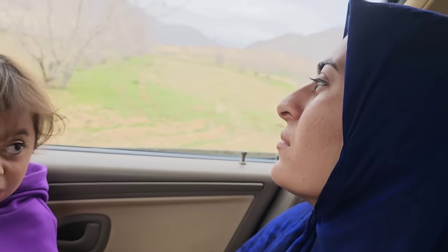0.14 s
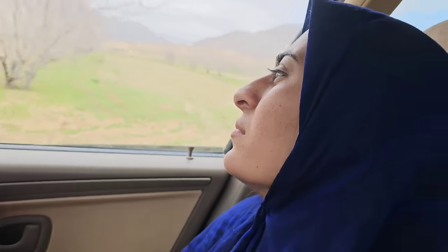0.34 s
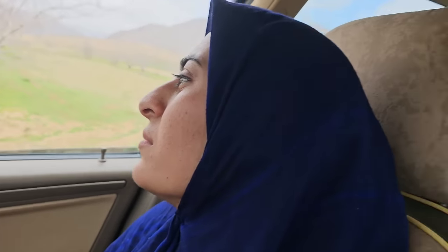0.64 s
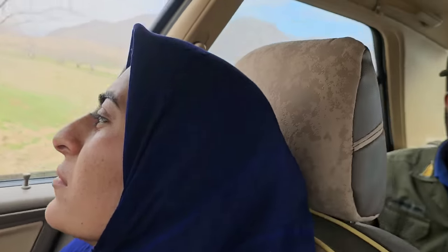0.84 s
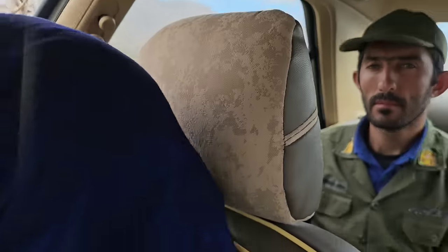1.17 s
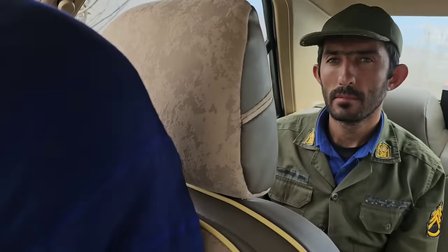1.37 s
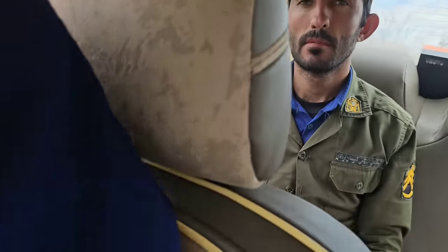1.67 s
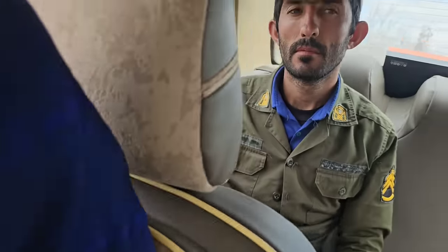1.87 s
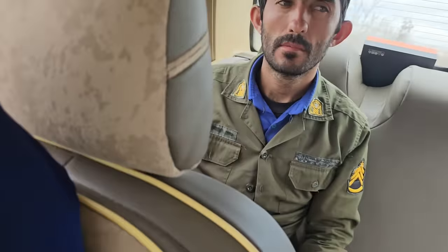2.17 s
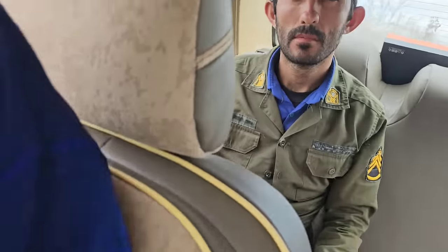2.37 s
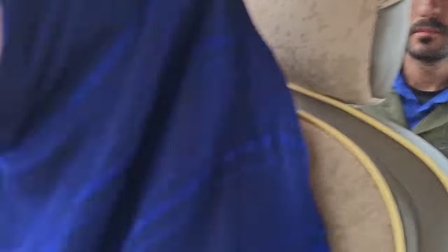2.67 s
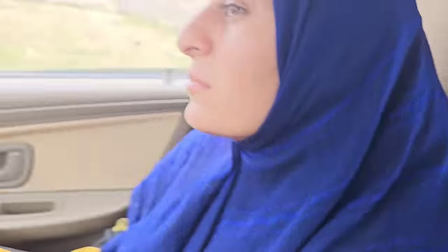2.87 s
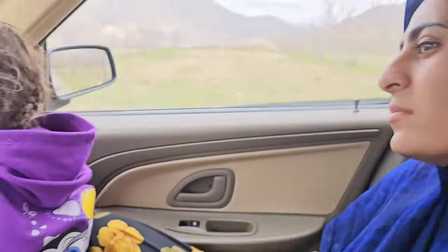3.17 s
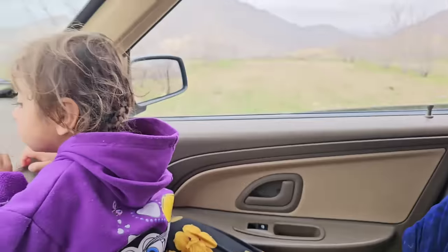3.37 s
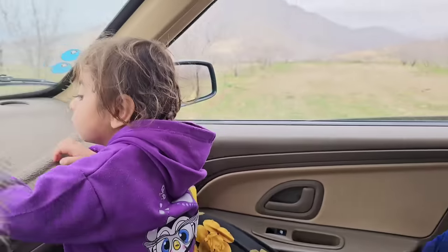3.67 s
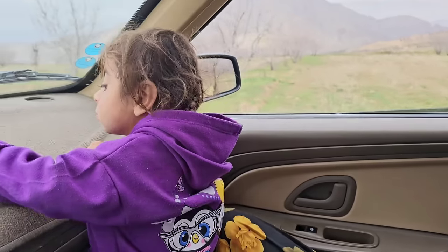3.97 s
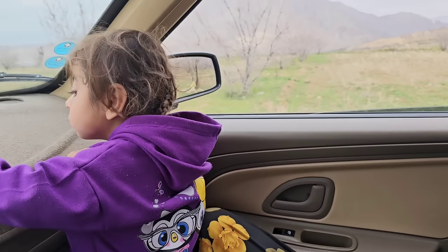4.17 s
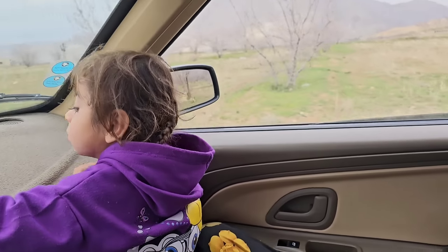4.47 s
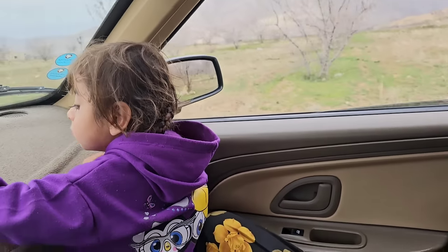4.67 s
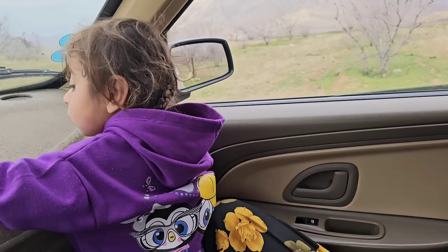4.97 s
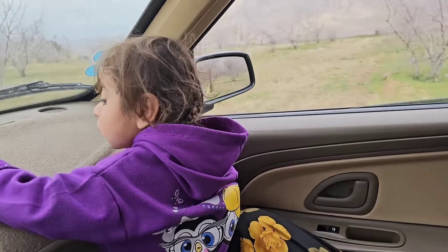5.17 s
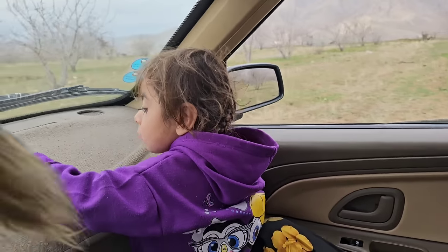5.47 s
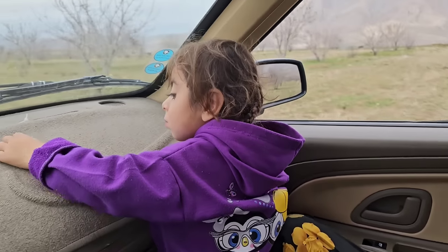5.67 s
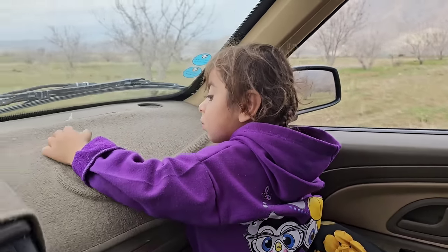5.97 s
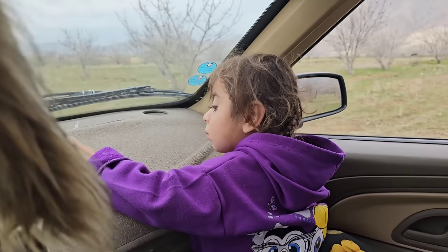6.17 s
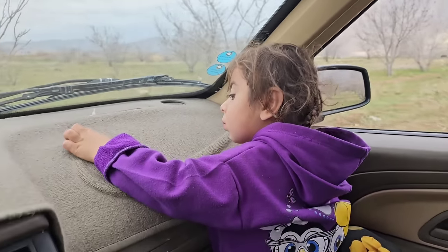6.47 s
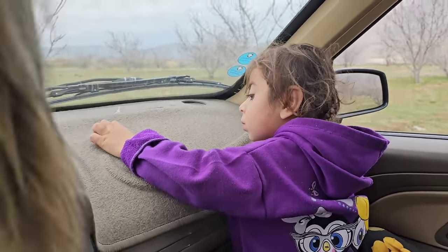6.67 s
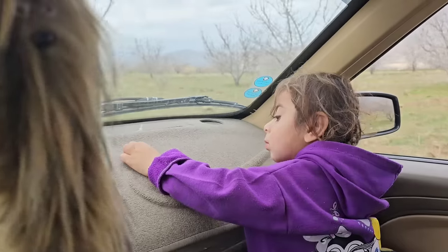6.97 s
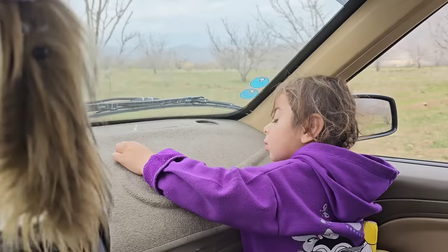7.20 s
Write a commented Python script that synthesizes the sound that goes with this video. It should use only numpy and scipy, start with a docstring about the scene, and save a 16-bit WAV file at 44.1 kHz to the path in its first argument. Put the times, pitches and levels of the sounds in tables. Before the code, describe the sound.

Inside a small closed car creeping along a rough dirt track: throbbing low boom, slow engine, tyre rumble, trim knocks, plastic ticks and clothing rustle.

```python
"""Small car on a rough track

Inside a small car that creeps along a rough dirt track with the windows shut.
Wandering tones and low noise form a throbbing cabin boom; firing harmonics form a slow engine.
Coloured noise and grains form tyre rumble and crunching grit; a rough modulated tone is the faint gearbox.
Bumps thump as sagging tones, loose trim knocks and ticks through decaying resonances, a clip chatters
as filtered taps and a wavering squeak, and clothes rustle against the seats as filtered grains."""
import sys
import numpy as np
from scipy import signal
from scipy.fft import rfft, irfft, next_fast_len
from scipy.io import wavfile
from scipy.ndimage import uniform_filter1d

SR = 44100
rng = np.random.default_rng(int(sys.argv[2]) if len(sys.argv) > 2 else 0)


def wav_out(sig):
    """Save sig, one row per channel (or a flat mono array), as 16-bit PCM at SR to the path in sys.argv[1]."""
    wavfile.write(sys.argv[1], SR, np.round(np.clip(np.atleast_2d(sig).T, -1, 1) * 32767).astype(np.int16))


N = 323694
T = np.arange(N) / SR

# Levels in the tables are relative: each source adds its own gain.
# Spectra list f/Hz, level/dB (spectral density).

# clothes sliding on the seats: [t/s, level/dB]
CLOTH_SWAY = [(0, -66), (.2, -66), (.35, -65.5), (.5, -63), (.62, -62), (.78, -66), (.9, -69.5), (1.0, -60),
              (1.12, -69), (1.3, -67.5), (1.42, -65.5), (1.5, -58), (1.6, -62.5), (1.72, -75),
              (1.92, -74.5), (2.03, -67.5), (2.2, -65.5), (2.3, -71), (2.6, -74), (2.8, -76), (2.9, -69),
              (3.05, -64.5), (3.17, -82), (3.35, -69), (3.56, -75), (3.75, -68.5), (3.9, -83),
              (4.05, -65.5), (4.17, -71), (4.28, -84.5), (4.55, -78), (4.7, -72), (4.9, -81), (5.1, -77),
              (5.25, -80), (5.65, -77.5), (5.85, -81.5), (5.95, -83), (6.6, -88.5), (6.75, -67.5),
              (6.95, -81.5), (7.1, -71), (7.24, -80), (7.3, -83)]
# short surges of rustle or grit: [t/s at the loudest, full width at 1/e /s, level/dB]
RUSTLE_SURGES = [(0.527, 0.1, -59.5), (2.942, 0.07, -64), (3.069, 0.2, -64.5), (4.016, 0.11, -63),
                 (4.702, 0.13, -69), (5.022, 0.036, -65), (5.075, 0.019, -67), (5.117, 0.022, -61),
                 (5.43, 0.06, -73), (6.711, 0.044, -64), (6.731, 0.019, -55.5), (6.824, 0.076, -67),
                 (7.084, 0.092, -61), (7.215, 0.079, -61)]
# spectrum of rubbing fibres: [f/Hz, level/dB]
CLOTH_SPECTRUM = [(700, -10.5), (1500, -1.5), (2600, -2.5), (3500, -3), (4700, -0.5), (5800, -4.5),
                  (7400, -5), (9300, -5), (10400, -10.5), (13200, -12), (15600, -7)]
# a loose clip chattering after a jolt: [onset t/s, decay time to 1/e /s, level/dB]
CLIP_CHATTERS = [(1.956, 0.016, -57.5), (1.995, 0.015, -58.5), (2.03, 0.034, -71)]
CHATTER_SPECTRUM = [(1000, -28), (1500, 5), (2100, -19.5), (2700, -3.5), (2950, 4), (3200, -14),
                    (3800, -18)]
# pitch of the gear mesh, which follows the road speed: [t/s, f/Hz]
MESH_PITCH = [(0.15, 502.5), (0.5, 480.3), (1.0, 453.7), (1.6, 460), (2.15, 491.6), (2.5, 457), (2.65, 474),
              (2.85, 456), (3.4, 482), (4.5, 479.5), (4.8, 464), (5.3, 455.2), (6.7, 483.5)]
# load on the gear teeth: [t/s, level/dB]
GEAR_LOAD = [(0.0, -58), (0.18, -55), (0.42, -64.5), (0.55, -50), (0.87, -56.5), (1.03, -49), (1.12, -60),
             (1.66, -58), (1.9, -52.5), (2.15, -53), (2.25, -57.5), (2.7, -54.5), (2.88, -63), (2.96, -50),
             (3.05, -61), (3.27, -71), (3.33, -52), (3.7, -70), (3.93, -60), (4.03, -53), (4.18, -55.5),
             (4.36, -62.5), (4.5, -53.5), (4.7, -53.5), (4.93, -61), (5.13, -51), (5.31, -53.5),
             (5.58, -62.5), (5.88, -58), (6.12, -57), (6.6, -58), (6.73, -48.5), (6.82, -71.5), (7.02, -58),
             (7.28, -56)]
# a thin drivetrain whistle: [t/s, level/dB]
WHISTLE_LEVEL = [(0, -83.5), (0.9, -74.5), (2.55, -71), (2.75, -100)]
WHISTLE_HZ = 1062  # mean pitch
# small plastic parts ticking: [t/s, 2 ms before the sound; peak level/dB; ring f/Hz;
# left minus right level/dB; cabin echo level/dB]
PLASTIC_TICKS = [(0.654, -52, 4860, 6, -4), (0.7, -45.5, 3860, -0.5, 3.5), (0.9316, -50, 3960, -1, -6),
                 (0.97, -36, 4270, -2.5, -1.5), (0.975, -46, 4300, 1, 0), (1.0234, -47, 4100, 12, -2),
                 (1.324, -50.5, 4470, 2.5, 3.5), (2.117, -52, 4600, -20, -1), (2.219, -51, 4000, 0, 2),
                 (2.4068, -46, 7700, -7, 5), (2.7333, -54.5, 6950, 3, 0), (2.9465, -50, 4300, -6, 0),
                 (3.201, -56, 8100, 4, 3), (3.271, -46, 5570, 7.5, -5), (3.614, -54.5, 4580, 0.5, 1.5),
                 (3.673, -54.5, 3800, 10.5, 2), (3.778, -50.5, 4200, 5, 2), (4.226, -52, 10600, 1.5, 1.5),
                 (4.5373, -52.5, 4457, 2.5, 5), (5.28, -56, 7610, 2.5, -1), (5.598, -52, 11920, 2, -3),
                 (6.013, -55.5, 9000, 0, -3), (6.123, -37.5, 5800, 5, -11.5), (6.73, -48, 3930, 10, 2),
                 (6.8217, -54, 3880, 9, 6), (6.8994, -53.5, 4670, 0.5, 3), (7.0584, -52.5, 4210, 8, 6)]
# spectrum of a tick: [f/Hz, level/dB]
TICK_SPECTRUM = [(500, -17.5), (1400, -2.5), (2700, -9), (4300, -2.5), (7600, -3), (10000, -6),
                 (15500, -13)]
# loose trim panels knocking: [t/s, peak level/dB, ring f/Hz, tilt/dB per octave, left minus right level/dB]
PANEL_KNOCKS = [(0.078, -52, 1425, -4.5, -4), (0.8609, -52.5, 1460, -2.5, -2),
                (1.0238, -40.5, 1320, -4, -3), (1.4341, -45.5, 1420, 3.5, 1), (1.537, -45.5, 1460, -1, -3),
                (1.7773, -46, 1460, -1, -6), (2.2724, -46.5, 1900, -15, -3), (2.393, -49.5, 1580, 3, 1.5),
                (2.5496, -43.5, 1410, 1, 3), (3.157, -55, 1500, 3, 0), (3.2266, -42.5, 1870, -2.5, 2),
                (3.244, -43.5, 880, -9, -2.5), (3.316, -41.5, 2410, 2.5, 6), (3.3308, -44, 1700, 0, 0),
                (3.3488, -39, 2390, 1, 6), (3.356, -42, 1280, -5, -2), (3.5018, -46.5, 1300, 0.5, 0),
                (3.9519, -50.5, 1416, 4, -1), (3.973, -50, 2680, 5, 5), (4.045, -45, 1290, 3.5, -0.5),
                (4.0918, -45.5, 3130, 4, -4.5), (4.162, -49, 1440, -6.5, -5), (4.6317, -41, 2430, 1.5, 5),
                (4.632, -50, 1920, 0.5, -13), (4.643, -49, 2200, -1, -2), (4.6927, -53, 1680, 1, 4),
                (4.7606, -56, 2103, 8, 9), (6.623, -48.5, 1460, 1.5, 1.5), (6.639, -51, 1418, -8, 1)]
# spectrum of a knock: [f/Hz, level/dB]
KNOCK_SPECTRUM = [(200, -12.5), (600, 8), (900, 3), (1450, -1), (2400, -5.5), (3400, -6.5), (5500, -14),
                  (8000, -24.5), (15000, -39)]
# modes of the loose trim: [mean f/Hz, level/dB, t60/s]
LOOSE_TRIM_MODES = [(880, 0, 0.06), (1418, -4.5, 0.065), (1704, -5.5, 0.05), (1937, -2, 0.042),
                    (2420, -6.5, 0.07), (2970, -10.5, 0.038), (4300, -7, .04)]
# resonances of dashboard and door panels: [f/Hz, width/Hz, lift/dB]
PANEL_RESONANCES = [(1334, 91, 4), (1520, 90, 3), (2100, 150, 2.5), (2300, 200, 1), (2830, 300, 1.5),
                    (4300, 280, -1.5), (7570, 600, 2.5), (11540, 500, 5)]
# suspension thumps: [t/s, nominal peak level/dB, middle of the pitch sweep f/Hz]
SUSPENSION_THUMPS = [(0.522, -42.5, 373), (2.172, -36, 242), (2.709, -42.5, 261.6), (4.561, -36, 232),
                     (5.78, -38.5, 264)]
# tyres on the track: [t/s, rumble level/dB, floor-pan drone level/dB, grit level/dB]
TRACK_LEVELS = [(0.0, -40, -50, -70), (0.04, -36, -52.5, -63.5), (0.47, -36, -53.5, -61),
                (0.51, -31.5, -49.5, -69), (0.95, -41, -53.5, -64), (1.15, -33, -49.5, -66.5),
                (1.19, -35, -54.5, -68), (1.52, -34.5, -52.5, -58.5), (1.58, -33, -53, -67),
                (1.88, -37.5, -54.5, -67), (2.11, -36.5, -52, -66), (2.17, -28.5, -48.5, -67),
                (2.25, -33, -54, -67), (2.35, -29.5, -52, -65.5), (2.51, -36, -49.5, -67.5),
                (2.53, -33.5, -51, -66), (2.84, -35, -53.5, -64.5), (2.88, -27, -53, -64.5),
                (2.98, -40, -48.5, -62.5), (3.08, -34, -51, -65.5), (3.18, -38, -51.5, -65),
                (3.35, -31.5, -47.5, -56.5), (3.4, -37, -54, -67.5), (3.51, -31.5, -47.5, -65),
                (3.59, -40.5, -51.5, -71.5), (3.65, -29, -54, -71.5), (3.73, -35.5, -49, -63.5),
                (3.79, -26.5, -53.5, -69), (3.91, -40.5, -51.5, -63.5), (3.95, -29, -52, -71),
                (3.99, -37, -50, -63.5), (4.3, -37.5, -53.5, -70.5), (4.54, -41.5, -53, -70.5),
                (4.58, -32, -52.5, -62), (4.62, -35.5, -49.5, -67), (4.72, -34, -51.5, -69),
                (4.85, -36, -55, -68), (5.09, -32.5, -51, -64.5), (5.21, -34.5, -56, -72.5),
                (5.27, -29, -51.5, -71.5), (5.43, -32.5, -56.5, -68.5), (5.76, -36.5, -52, -70.5),
                (5.92, -33, -52, -74.5), (5.96, -37, -53, -72.5), (6.18, -34.5, -52, -71.5),
                (6.53, -38.5, -54, -73.5), (7.18, -35.5, -53, -72.5), (7.28, -41, -53, -69)]
# spectrum of lumps felt through the springs: [f/Hz, level/dB]
RUMBLE_SPECTRUM = [(45, -15.5), (62, 1.5), (85, -3.5), (105, -8.5), (125, -5.5), (148, -11), (185, -22.5),
                   (260, -46.5)]
# spectrum of stones on the floor pan: [f/Hz, level/dB]
DRONE_SPECTRUM = [(130, -17.5), (190, -4.5), (235, 1.5), (290, -1.5), (345, -8.5), (395, -5.5), (425, -3.5),
                  (520, -5.5), (610, -11.5), (770, -16.5), (900, -22), (1400, -30)]
# spectrum of grit under the tread: [f/Hz, level/dB]
GRIT_SPECTRUM = [(400, -9), (750, -7), (950, -1), (1250, -0.5), (1500, -0.5), (1900, -3), (2500, -6.5),
                 (3400, -9), (4400, -10.5), (5500, -21.5), (15000, -31.5)]
# a floor panel droning: [t/s, level/dB]
FLOOR_PANEL_LEVEL = [(0, -55), (.9, -54), (1.2, -54), (1.6, -46), (1.9, -51), (2.6, -49.5), (2.9, -52),
                     (3.1, -60), (3.7, -53), (4.3, -62.5), (7.3, -70)]
# spectrum of that panel: [f/Hz, level/dB]
FLOOR_PANEL_SPECTRUM = [(185, -21.0), (215, -1.5), (250, -7.5), (310, -17.5)]
# harmonics of the engine: [multiple of the firing rate, level/dB]
ENGINE_HARMONICS = [(1, -27.5), (2, -43.5), (3, -47.5)]
FIRING_HZ = 45.33  # mean rate
# throbbing level of the low cabin boom: [t/s, level/dB]
BOOM_THROB = [(0.0, -11.5), (0.09, -26), (0.13, -9.5), (0.2, -21.5), (0.28, -25.5), (0.34, -10.5),
              (0.39, -19.5), (0.43, -15), (0.49, -11.5), (0.51, -24.5), (0.57, -15.5), (0.61, -21.5),
              (0.65, -39), (0.69, -13), (0.73, -22), (0.79, -15), (0.93, -10), (0.95, -20), (1.14, -18.5),
              (1.18, -9), (1.22, -28.5), (1.28, -14.5), (1.32, -32.5), (1.36, -12.5), (1.42, -25),
              (1.44, -13), (1.57, -24), (1.61, -16), (1.75, -24.5), (2.09, -15.5), (2.11, -28.5),
              (2.15, -18.5), (2.3, -25), (2.38, -15.5), (2.42, -35.5), (2.46, -18.5), (2.54, -16.5),
              (2.77, -27), (2.88, -19), (3.03, -24), (3.05, -15), (3.09, -25.5), (3.15, -10), (3.19, -18),
              (3.23, -8), (3.27, -33), (3.39, -15), (3.54, -27), (3.64, -11), (3.68, -22), (3.76, -11.5),
              (3.8, -32), (3.82, -18.5), (3.99, -20), (4.05, -13), (4.12, -20), (4.2, -11), (4.25, -21),
              (4.3, -13), (4.335, -34), (4.37, -11.5), (4.41, -23), (4.45, -10.5), (4.55, -33.5),
              (4.59, -19), (4.61, -43.5), (4.65, -12), (4.72, -25), (4.76, -19), (4.84, -27), (4.88, -18.5),
              (5.06, -21.5), (5.16, -12), (5.18, -22), (5.24, -13), (5.35, -35.5), (5.43, -17),
              (5.55, -26.5), (5.63, -16), (5.69, -26.5), (5.79, -17.5), (5.85, -29.5), (5.9, -16.5),
              (5.96, -24.5), (6.04, -17.5), (6.26, -29), (6.32, -14), (6.38, -34), (6.42, -16), (6.49, -47),
              (6.53, -18.5), (6.65, -20.5), (6.71, -33.5), (6.83, -15.5), (6.87, -33), (6.99, -20.5),
              (7.1, -28), (7.3, -14)]
# spectrum of the air buffeting: [f/Hz, level/dB]
BOOM_SPECTRUM = [(12, -34.5), (19, -12.5), (25, -2), (33, 1), (44, -4.5), (50, -2), (56, -10.5), (66, -4.5),
                 (85, -36.5)]
# response that keeps the throbbing boom deep: [f/Hz, gain/dB]
BOOM_RESPONSE = [(21, 4.0), (54, 0), (68, -7.5), (100, -34.5)]
BOOM_HZ = 41.86  # mean note at which the cabin booms
# width of the cabin sound at two ports a hand apart: [f/Hz, side minus mid level/dB]
CABIN_WIDTH = [(40, -22), (70, -20), (120, -15), (200, -11), (380, -6.5), (700, -2.5), (1290, 1.5),
               (2400, 0), (15000, 0)]
TOP_HZ = 15700  # upper limit of the pickup


def undb(db):
    """Logarithmic measure: a level in decibels becomes an amplitude ratio."""
    return 10 ** (np.asarray(db) / 20)


def curves(table):
    """Linear interpolation: each column of a (t/s, ..) table is read at every sample."""
    s, *columns = np.transpose(table)
    return [np.interp(T, s, c) for c in columns]


def unit(x):
    """Normalisation: scale to an rms of 1."""
    return x / np.sqrt(np.mean(x ** 2))


def gains(points, size):
    """Frequency response: a (f/Hz, level/dB) table becomes a gain for every bin of a transform."""
    hz, db = np.transpose(points)
    f = np.maximum(np.fft.rfftfreq(size, 1 / SR), 1)
    octaves_below = np.maximum(np.log2(hz[0] / f), 0)
    octaves_above = np.maximum(np.log2(f / hz[-1]), 0)
    # outside the table the response falls by 30 dB per octave
    return undb(np.interp(np.log(f), np.log(hz), db) - 30 * (octaves_below + octaves_above))


def colour(x, points):
    """Linear filtering: the spectrum is multiplied by a (f/Hz, level/dB) response."""
    size = next_fast_len(x.shape[-1])
    return irfft(rfft(x, size) * gains(points, size), size)[..., :x.shape[-1]]


def resonate(modes, size):
    """Resonance: gain for every bin of a transform, lifted around each (f/Hz, width/Hz, lift/dB) mode."""
    f = np.fft.rfftfreq(size, 1 / SR)
    return undb(sum(db / (1 + (2 * (f - hz) / width) ** 2) for hz, width, db in modes))


def through_trim(x):
    """Transmission: sound that reaches the ears by way of the panels takes on their resonances."""
    size = next_fast_len(N)
    return irfft(rfft(x, size) * resonate(PANEL_RESONANCES, size), size)[:, :N]


def walk(rate):
    """Random modulation: smooth chance that changes about rate times a second, with rms 1."""
    k = int(SR / rate)
    steps = np.repeat(rng.standard_normal(N // k + 1), k)
    smooth = uniform_filter1d(uniform_filter1d(steps, k), k)
    return unit(smooth[:N])


def cabin(pair):
    """Diffuse field: two unrelated signals give bass alike in both ears and treble unrelated."""
    mid, side = pair[0], colour(pair[1], CABIN_WIDTH)
    return np.array([mid + side, mid - side]) / np.sqrt(np.mean(mid ** 2))


def noise(points):
    """Filtered random noise: a diffuse field of a given spectrum."""
    return cabin(colour(rng.standard_normal((2, N)), points))


def grains(points, rate, spread_db, bed, size=256):
    """Shot noise: tiny unequal clicks over a smooth bed, at shared times with a different waveform per channel."""
    count = int(rate * N / SR)
    starts = rng.integers(0, N, count)
    at = (starts[:, None] + np.arange(size)).ravel()
    sizes = undb(spread_db * np.minimum(rng.exponential(size=(count, 1)), 4))
    decay = np.exp(-T[:size] / 0.0016)
    bursts = rng.standard_normal((2, count, size)) * sizes * decay
    clicks = unit(np.array([np.bincount(at, b.ravel(), N)[:N] for b in bursts]))
    return cabin(colour(clicks + bed * rng.standard_normal((2, N)), points))


def shifting(x, depth_db, size=512, frames_count=7, bins_count=5):
    """Spectral modulation: narrow patches swell and fade on their own, so the colour never sits still."""
    spectra = signal.stft(x, nperseg=size)[2]
    patches = uniform_filter1d(rng.standard_normal(spectra.shape[1:]), frames_count, axis=1)
    patches = unit(uniform_filter1d(patches, bins_count, axis=0))
    varied = spectra * unit(undb(depth_db * patches))
    return signal.istft(varied, nperseg=size)[1][:, :N]


def level_peak(sound):
    """Short-time level: scale so that the 1 ms rms of the mean of both ears peaks at 1."""
    return sound / np.sqrt(uniform_filter1d(sound.mean(0) ** 2, SR // 1000).max())


def strike(points, ring, tilt_db, pan_db, echo_db, t60, size=4096):
    """Impulse response: a blow excites a part's own ring, as direct sound and then dense reflections."""
    t = T[:size]
    envelope = np.exp(-np.log(1000) * t / t60) * (1 - np.exp(-t / 0.001))
    tail = rng.standard_normal((2, size)) * envelope
    blow = undb(echo_db) * tail / np.sqrt(np.sum(tail ** 2) / 2)
    # the direct sound reaches the far ear up to 20 samples late
    lag = int(np.clip(abs(pan_db) * 8, 0, 20))
    near = int(pan_db < 0)
    blow[near, 0] += 1
    blow[1 - near, lag] += 1
    # the part's colour as a causal (minimum-phase) response, so nothing sounds before the blow
    tilted = [(hz, db + tilt_db * np.log2(hz / 3000)) for hz, db in points]
    response = gains(tilted, size) * resonate([*PANEL_RESONANCES, ring], size)
    cepstrum = irfft(np.log(response + 1e-4))
    cepstrum[1:size // 2] *= 2
    cepstrum[size // 2 + 1:] = 0
    sound = irfft(rfft(blow) * np.exp(rfft(cepstrum)))
    return level_peak(sound * undb([[pan_db / 2], [-pan_db / 2]]))


def ringing(hz, tilt_db, pan_db, own_db=3, own_t60=0.042, scatter_db=5.5, away_db=4, size=6144):
    """Modal decay: the modes of the trim ring on after a blow, favouring those near the struck part's note."""
    t, sound = T[:size], 0
    for f, db, t60 in [*LOOSE_TRIM_MODES, (hz, own_db, own_t60)]:
        strength, detune, left, right = rng.standard_normal(4)
        octaves = np.log2(f / hz)
        gain = undb(db + scatter_db * strength + tilt_db * octaves / 2 - away_db * abs(octaves))
        phase = 2 * np.pi * f * (1 + .015 * detune) * t + np.array([[left], [right]])
        sound = sound + gain * np.sin(phase) * np.exp(-np.log(1000) * t / t60)
    onset = 1 - np.exp(-t / .001)
    return level_peak(sound * onset * undb([[pan_db / 2], [-pan_db / 2]]))


def add(out, s, sound):
    """Superposition: a sound is summed in from time s."""
    i = max(int(s * SR), 0)
    out[:, i:i + sound.shape[-1]] += sound[..., :N - i]


def clothes(cloth_db=-1.92, surge_db=-2.0, catch_db=0.0, fold_db=1.4):
    """Stick-slip friction: fibres catch and slip, fold by fold, as passengers sway; short surges stand out."""
    sway = undb(curves(CLOTH_SWAY)[0] + cloth_db)
    surges = sum(undb(db + surge_db) * np.exp(-(2 * (T - s) / length) ** 2)
                 for s, length, db in RUSTLE_SURGES)
    rubbing = grains(CLOTH_SPECTRUM, rate=500, spread_db=3.8, bed=.8)
    fibres = shifting(through_trim(rubbing), 2.8)
    unevenness = undb(catch_db * walk(110) + fold_db * walk(30))
    return fibres * np.hypot(sway, surges) * unevenness


def chatter(squeak_hz=2920, squeak_db=-5, taps_db=0.5):
    """Repeated contact: a loose clip buzzes in filtered taps, with a wavering squeak, and dies away."""
    taps = grains(CHATTER_SPECTRUM, rate=300, spread_db=2, bed=.4)
    squeak = unit(np.sin(2 * np.pi * np.cumsum(squeak_hz * (1 + .045 * walk(500))) / SR))
    jolts = sum(undb(db) * (T > s) * np.exp(-np.abs(T - s) / length) for s, length, db in CLIP_CHATTERS)
    return (undb(taps_db) * taps + undb(squeak_db) * squeak) * jolts


def gearbox(mesh_db=-2.5, upper_db=-4.5, upper_hz=522, whistle_db=-2):
    """Periodic tooth contact: a rough mesh note follows the speed, with a steady casing ring and a thin whistle."""
    mesh_phase = 2 * np.pi * np.cumsum(curves(MESH_PITCH)[0]) / SR
    casing_phase = 2 * np.pi * np.cumsum(upper_hz * (1 + .012 * walk(2))) / SR
    pair = []
    # complex random amplitudes roughen the tones; only the mid signal has a steady part
    for steady in (1, 0):
        mesh = (steady + .8 * (walk(35) + 1j * walk(35))) * np.exp(1j * mesh_phase)
        upper = (walk(30) + 1j * walk(30)) * np.exp(1j * casing_phase)
        pair.append(unit(mesh.real) + undb(upper_db) * unit(upper.real))
    louder_left = undb([[2.2], [-2.2]])
    song = cabin(np.array(pair)) * undb(curves(GEAR_LOAD)[0] + mesh_db) * louder_left
    whistle = unit(np.sin(2 * np.pi * np.cumsum(WHISTLE_HZ * (1 + 0.013 * walk(40))) / SR))
    return song + whistle * undb(curves(WHISTLE_LEVEL)[0] + whistle_db + 2.0 * walk(22))


def trim(knock_db=-3.5, modes_db=-9.0, tick_db=-3.5, knock_echo_db=5, knock_t60=0.066, tick_t60=0.044,
         knock_ring_db=5, tick_ring_db=9):
    """Impact excitation: loose panels knock and ring in their modes, and small parts tick."""
    out = np.zeros((2, N))
    for s, db, hz, tilt_db, pan_db in PANEL_KNOCKS:
        ring = (hz, 0.28 * hz, knock_ring_db)
        knock = strike(KNOCK_SPECTRUM, ring, tilt_db, pan_db, knock_echo_db, knock_t60)
        add(out, s, undb(db + knock_db) * knock)
        add(out, s, undb(db + modes_db) * ringing(hz, tilt_db, pan_db))
    for s, db, hz, pan_db, echo_db in PLASTIC_TICKS:
        ring = (hz, 0.31 * hz, tick_ring_db)
        tick = strike(TICK_SPECTRUM, ring, 0, pan_db, echo_db, tick_t60)
        add(out, s + 0.002, undb(db + tick_db) * tick)
    return out


def suspension(swell_s=0.0087):
    """Damped transient: a wheel drops into a hole, a soft, rough thump whose pitch sags as the load eases."""
    out, t = np.zeros((2, N)), T[:SR // 5]
    envelope = t / swell_s * np.exp(1 - t / swell_s)  # peaks at 1 after swell_s
    for s, db, hz in SUSPENSION_THUMPS:
        # from 17 % above the middle pitch towards 17 % below
        phase = 2 * np.pi * np.cumsum(hz * (1 + .17 * (2 * np.exp(-t / .025) - 1))) / SR
        judder = .6 * walk(110)[:len(t)]
        add(out, s, undb(db) * envelope * (np.sin(phase) + judder * np.cos(phase)))
    return out


def pebbles(rate=45, spread_db=3, ring_s=0.0062, size=1024):
    """Free vibration: single stones snap out from under the tread, each with its own short ring."""
    out, t = np.zeros((2, N)), T[:size]
    for when, pitch, luck, left, right in rng.random((int(rate * N / SR), 5)):
        hz = 1200 * 2 ** (2.3 * pitch)
        ring = np.sin(2 * np.pi * (hz * t + np.array([[left], [right]]))) * np.exp(-t / ring_s)
        # sizes are very unequal, and higher rings are weaker
        level_db = spread_db * min(-np.log(1 - luck), 3) - 5 * pitch
        add(out, when * (N - 1) / SR, ring * undb(level_db))
    return unit(out)


def tyres(rumble_db=-0.1, drone_db=0.48, grit_db=-3, jolt_db=3.0, panel_db=0, stones_db=-12):
    """Rough-surface excitation: lumps rumble through springs, stones drum the floor pan, grit and gravel crunch."""
    rumble, drone, grit = curves(TRACK_LEVELS)
    fine = grains(GRIT_SPECTRUM, rate=500, spread_db=4, bed=1) * undb(grit_db + jolt_db * walk(30))
    coarse = pebbles() * undb(stones_db)
    crunch = shifting(through_trim(fine + coarse), 2)
    panel = noise(FLOOR_PANEL_SPECTRUM) * undb(curves(FLOOR_PANEL_LEVEL)[0] + panel_db)
    drumming = grains(DRONE_SPECTRUM, rate=400, spread_db=2.5, bed=1.2)
    return (noise(RUMBLE_SPECTRUM) * undb(rumble + rumble_db) + panel
            + drumming * undb(drone + drone_db) + crunch * undb(grit))


def engine():
    """Harmonic series of the firing rate: a four-cylinder at low revs, its speed and load a little unsteady."""
    phase = 2 * np.pi * np.cumsum(FIRING_HZ * (1 + 0.0248 * walk(2))) / SR
    return sum(undb(db + 2.0 * walk(8.3)) * np.sin(k * phase) for k, db in ENGINE_HARMONICS)


def boom(boom_db=-2.0, wander=0.14795, buffet_db=-5.0):
    """Amplitude modulation: unsteady low tones and buffeting air form a cabin boom whose level throbs."""
    tones = [np.sin(2 * np.pi * np.cumsum(BOOM_HZ * (1 + wander * walk(20))) / SR) for _ in range(2)]
    air = cabin(np.array(tones)) + undb(buffet_db) * noise(BOOM_SPECTRUM)
    throbbing = air * undb(curves(BOOM_THROB)[0] + boom_db)
    # filtering after the modulation keeps the swells deep in pitch
    return colour(throbbing, BOOM_RESPONSE)


def scene():
    """Superposition of all sources, as heard from the front seats."""
    return clothes() + chatter() + gearbox() + trim() + suspension() + tyres() + engine() + boom()


def record(dry, hiss_db=-87):
    """Two-port pickup: faint hiss, the left port a little more sensitive, a 4 ms fade-in, the top cut off."""
    ports = dry * undb([[.28], [-.28]]) * np.minimum(T / .004, 1)
    hiss = undb(hiss_db) * rng.standard_normal((2, N))
    low_pass = signal.ellip(12, .1, 80, TOP_HZ, fs=SR, output="sos")
    return signal.sosfilt(low_pass, ports + hiss)


dry = scene()
out = record(dry)
wav_out(out)
```